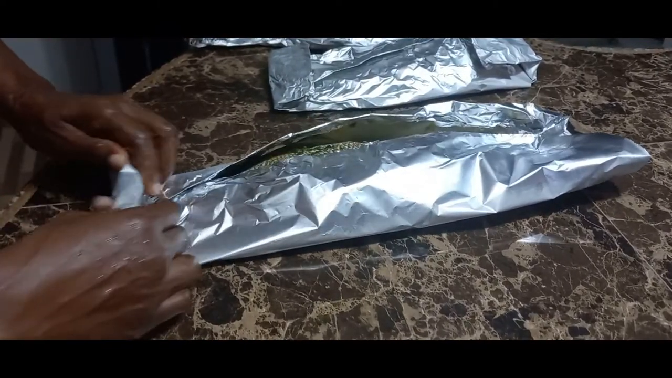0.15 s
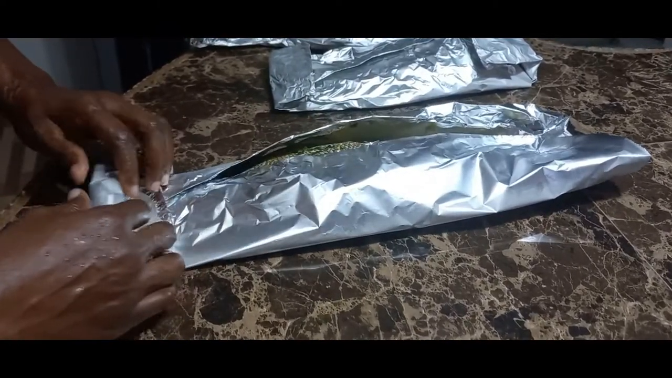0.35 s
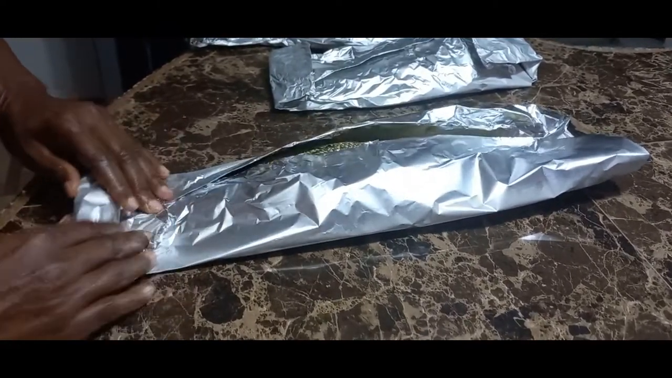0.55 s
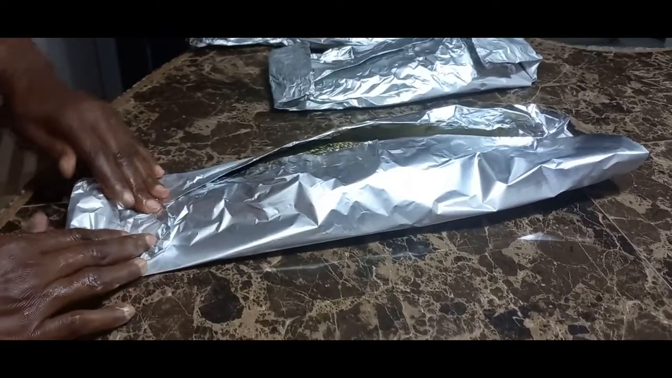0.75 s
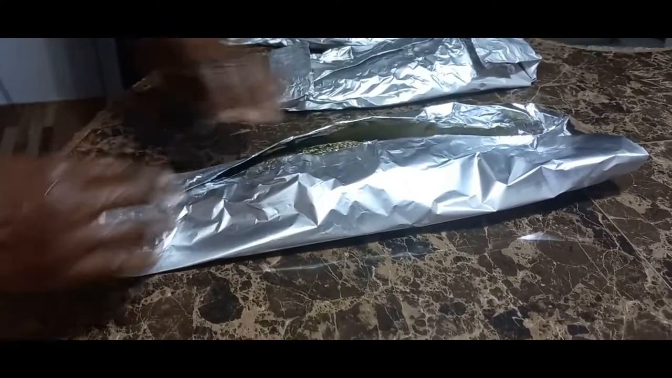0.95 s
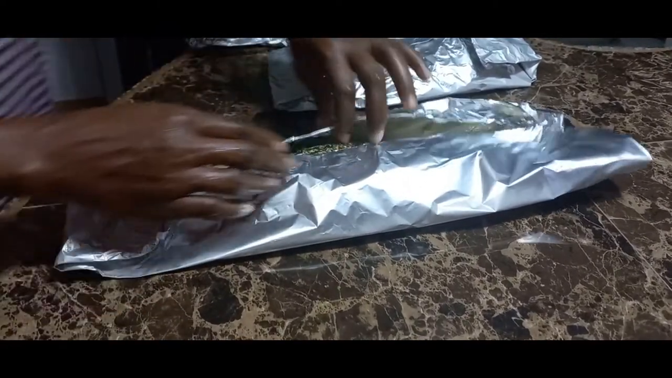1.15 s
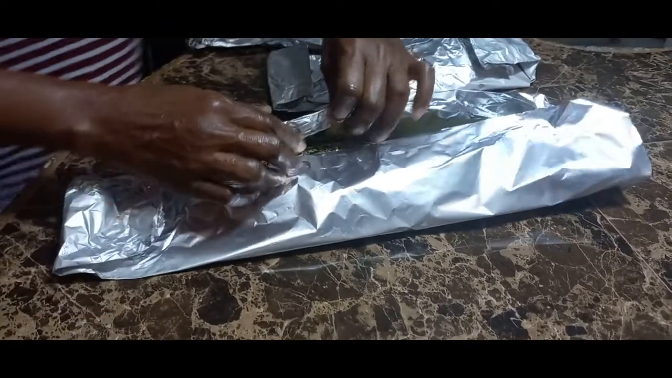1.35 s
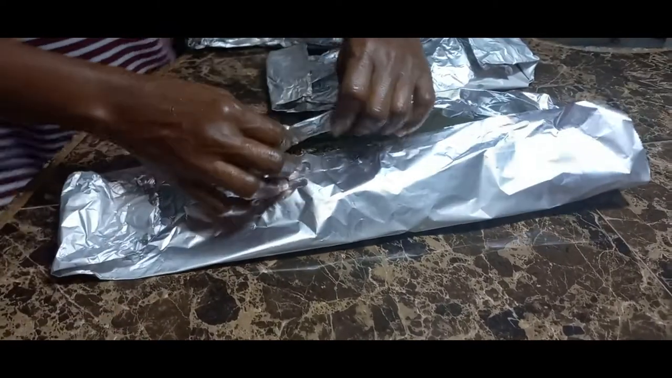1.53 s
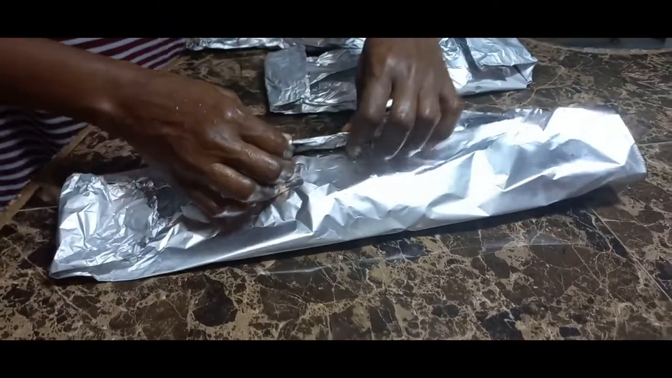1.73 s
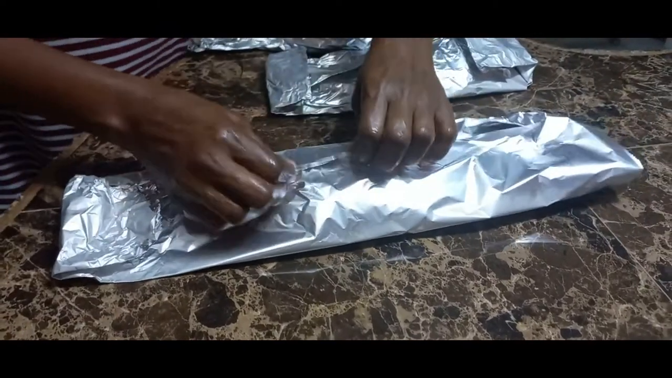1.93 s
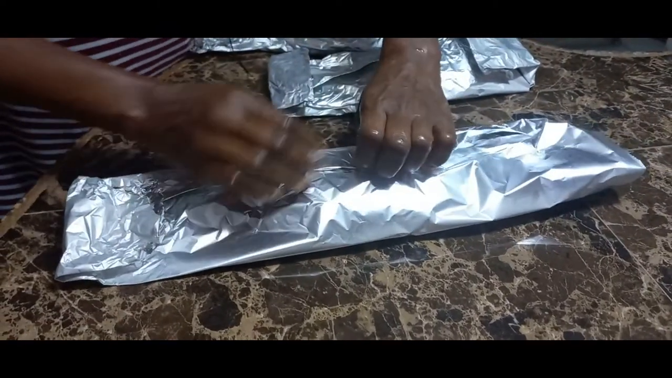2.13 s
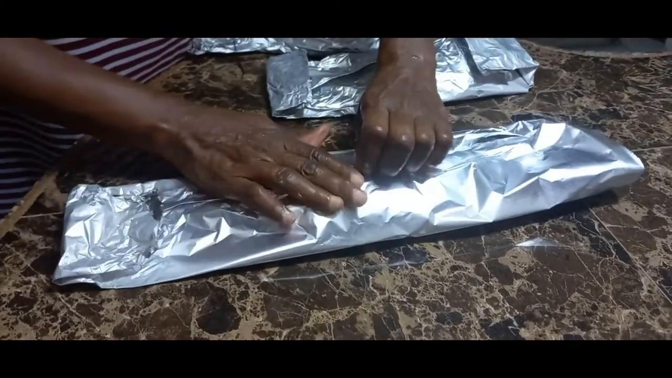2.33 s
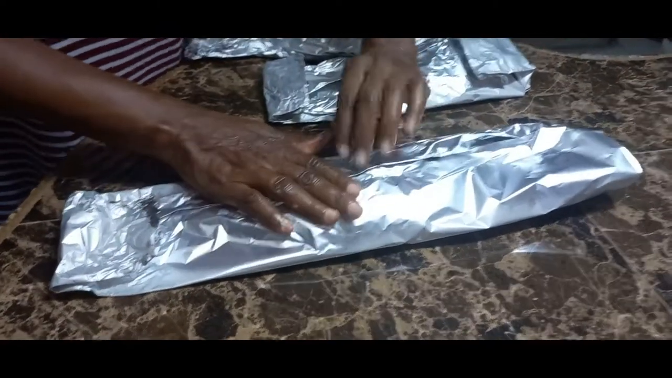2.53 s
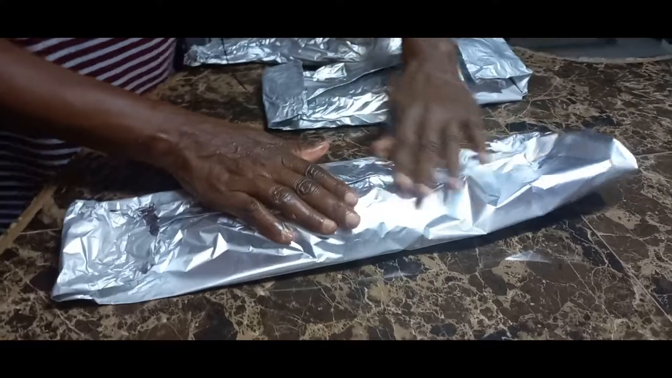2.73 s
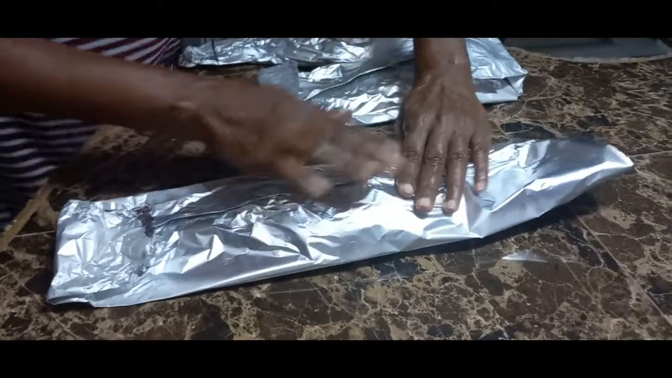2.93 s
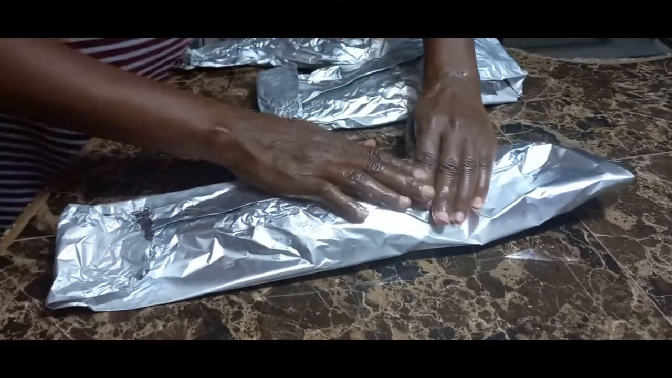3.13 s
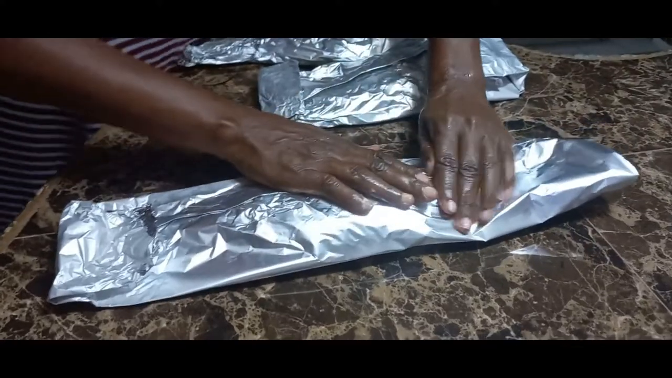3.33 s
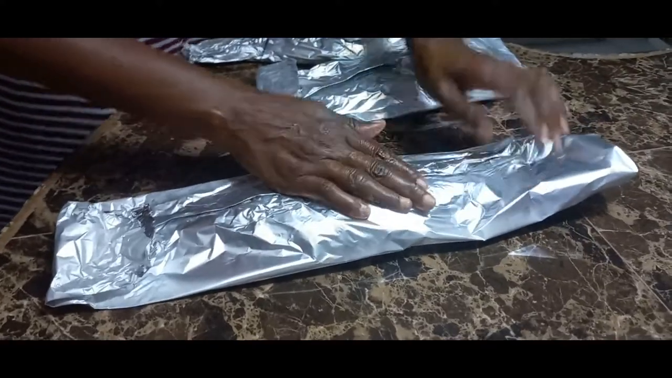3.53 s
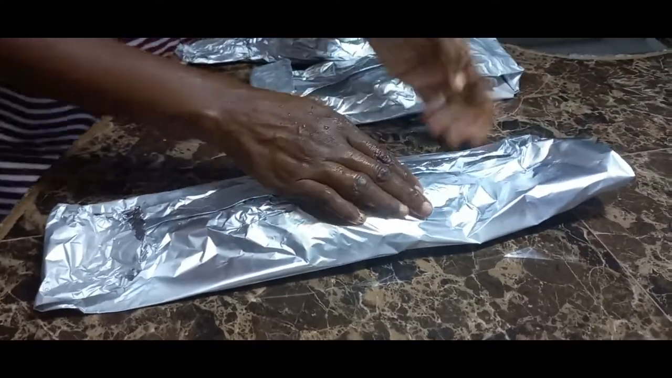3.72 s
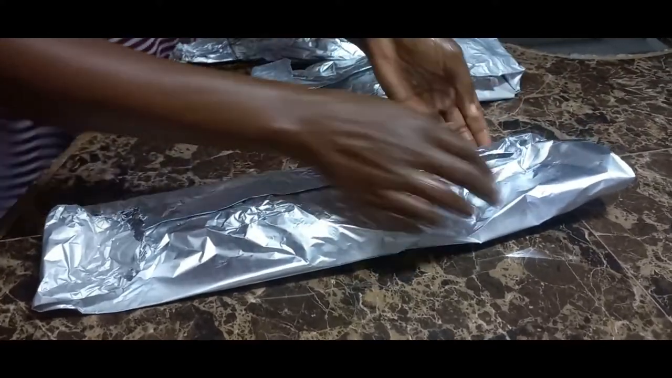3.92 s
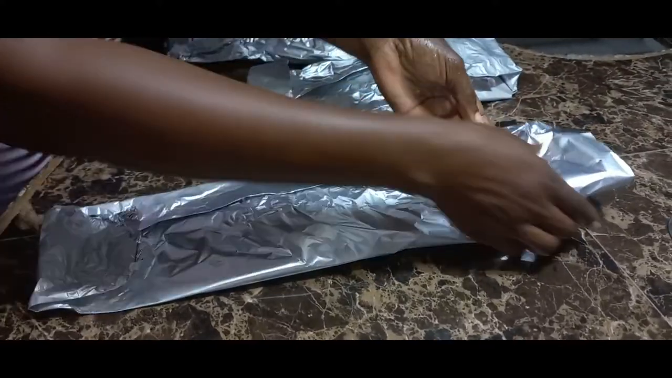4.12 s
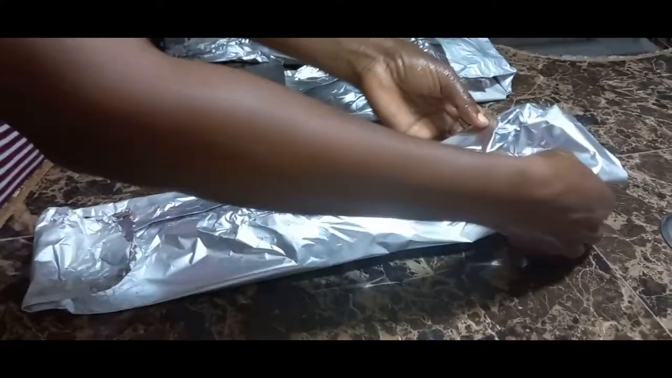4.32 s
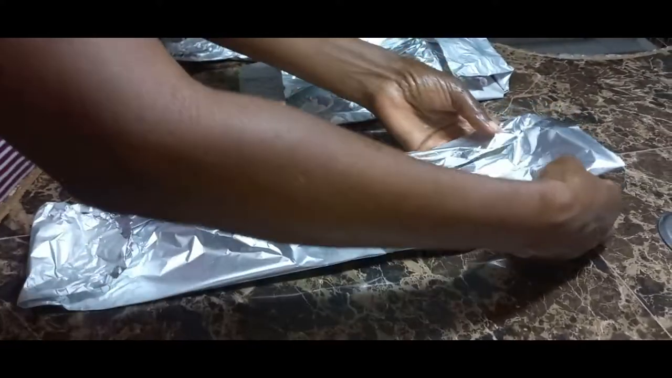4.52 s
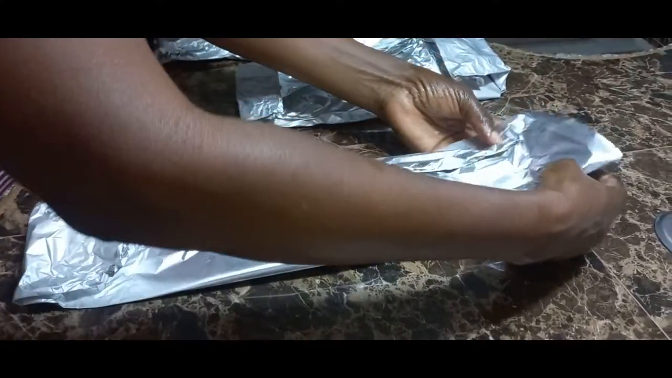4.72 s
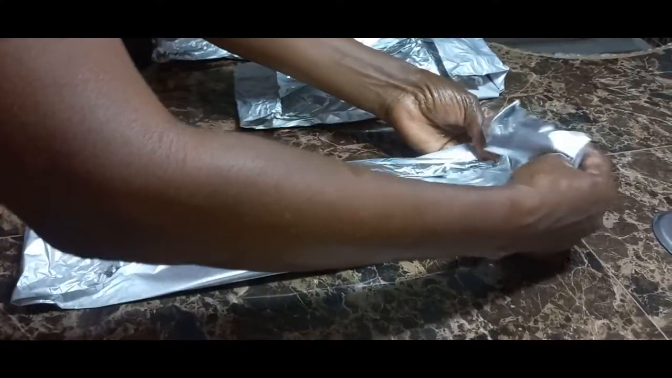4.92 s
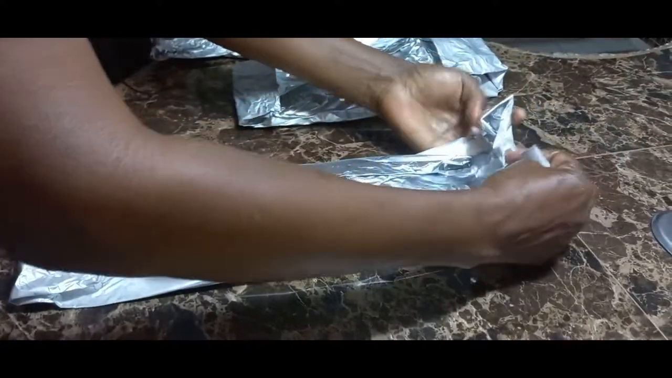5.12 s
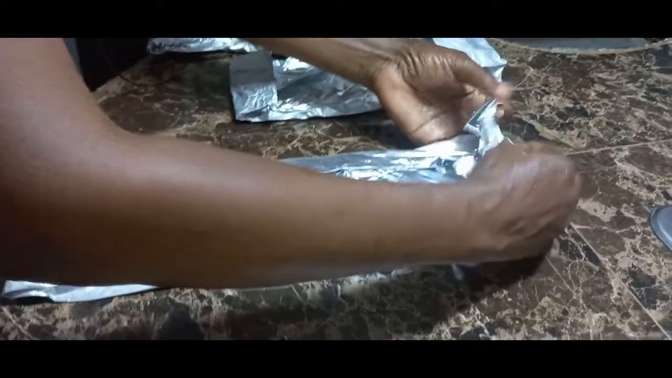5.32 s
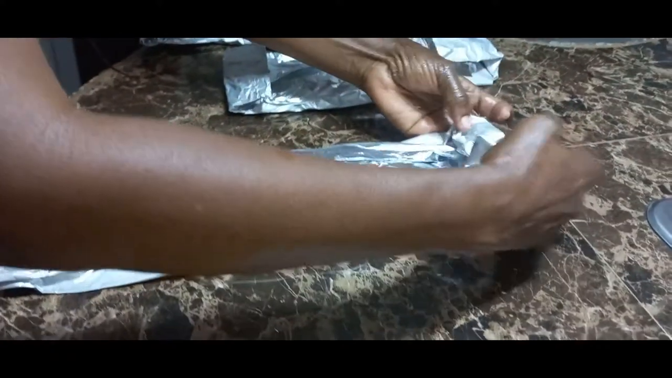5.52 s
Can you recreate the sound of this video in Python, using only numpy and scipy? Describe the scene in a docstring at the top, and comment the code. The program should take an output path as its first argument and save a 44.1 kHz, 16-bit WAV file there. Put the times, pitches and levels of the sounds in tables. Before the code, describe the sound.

Hands fold, crimp and press aluminium foil around a parcel in repeated bright, crackling bursts, with sharper snaps, in a small kitchen.

```python
"""Wrapping a parcel in foil.

Two hands fold, crimp and press aluminium foil round a parcel on a kitchen counter. Each push makes
creases buckle in a shower of tiny clicks, with louder snaps as large creases flip. These impulses
excite flat panels, which ring near 2 kHz, and the hollow parcel, which crunches.
A small hard room reverberates, over low noise and the faint hum of an appliance."""
import sys
import numpy as np
from scipy import signal
from scipy.fft import rfft, irfft, next_fast_len
from scipy.io import wavfile

SR = 44100
rng = np.random.default_rng(int(sys.argv[2]) if len(sys.argv) > 2 else 0)


def dump(signal):
    """Clip the signal to [-1, 1] and save it as 16-bit WAV at the path in sys.argv[1]."""
    limited = np.clip(np.atleast_2d(signal).T, -1, 1)
    pcm = np.round(limited * 32767).astype(np.int16)
    wavfile.write(sys.argv[1], SR, pcm)


N = 245195
TIME = np.arange(N) / SR
BAND_LIMIT_HZ = 15950

# Levels in all tables are relative: later gains set the loudness.
# Pushes of the fingers. Each row: start, tightening time and easing time in seconds, crackle level
# in dB, then panel ring, hollow crunch and brightness in dB against the crackle.
PUSHES = [(0.0, 0.00033, 0.04, -45.5, -4, -17, -2.5), (0.079, 0.087, 0.088, -55.5, -4, -31, -2.5),
          (0.295, 0.021, 0.029, -60, -13, -26.5, -1), (0.339, 0.017, 0.15, -53, -3.5, -24, -1.5),
          (0.501, 0.023, 0.1, -49.5, -7, -16, 0), (0.585, 0.096, 0.019, -46.5, -9, -21, -1.5),
          (0.811, 0.0085, 0.022, -74, 17.5, -7, -14), (0.874, 0.046, 0.029, -55.5, -4.5, -19, -2),
          (0.954, 0.0054, 0.0018, -45, -20, -26, 5.5), (1.181, 0.018, 0.13, -52, -7.5, -7, -1.5),
          (1.269, 0.096, 0.062, -47, -3.5, -7.5, -5.5), (1.389, 0.014, 0.11, -47, -5.5, -16.5, -1),
          (1.489, 0.017, 0.08, -44.5, -6.5, -10.5, -0.5), (1.564, 0.0092, 0.0074, -47.5, -1, -1, -11),
          (1.633, 0.045, 0.037, -49.5, -2.5, -11.5, -6), (1.757, 0.017, 0.12, -44.5, -9, -18, -1.5),
          (1.875, 0.0081, 0.093, -39, -10, -14, -2), (1.991, 0.071, 0.12, -46, -8, -19, 0),
          (2.25, 0.023, 0.022, -55, -3, -18, -1), (2.279, 0.051, 0.037, -46, -11, -12.5, -6),
          (2.325, 0.013, 0.03, -39.5, -2, -17, -5), (2.373, 0.035, 0.037, -46, -5, -14.5, -2),
          (2.464, 0.059, 0.032, -50, 1.5, -19, -3), (2.614, 0.069, 0.041, -52, -4, -17, -3.5),
          (2.745, 0.048, 0.027, -51, -5, -13, -6), (2.784, 0.017, 0.13, -44, -9, -12, -3.5),
          (2.998, 0.041, 0.064, -48, -5.5, -12.5, -6), (3.08, 0.036, 0.23, -47.5, -4.5, -12.5, -2),
          (3.225, 0.066, 0.043, -44, -4.5, -7.5, -3.5), (3.35, 0.012, 0.38, -53.5, -5, -13, -1.5),
          (3.495, 0.034, 0.055, -50, -7, -10.5, -1.5), (3.629, 0.062, 0.037, -59.5, -9, -27.5, -4),
          (3.75, 0.071, 0.04, -70, -3, -23, 1), (3.825, .02, 0.022, -59.5, -9.5, -30.5, 2),
          (3.886, 0.0052, 0.15, -57, -6, -14.5, -5), (4.007, 0.017, 0.069, -45.5, -7, -12.5, -2.5),
          (4.13, 0.008, 0.15, -53.5, -5.5, -21, -6), (4.207, 0.016, 0.071, -45, -4, -9.5, -1.5),
          (4.255, 0.036, 0.12, -43, -6.5, -12, -1.5), (4.399, 0.11, 0.036, -45.5, -5.5, -15, -4.5),
          (4.478, 0.028, 0.08, -38.5, -9, -14.5, -1.5), (4.6, .02, 0.35, -46.5, -7.5, -17, -3),
          (4.729, 0.082, 0.18, -40, -7, -13.5, -2), (4.999, 0.036, 0.02, -41, -12, -14.5, -0.5),
          (5.07, 0.053, 0.057, -50.5, -2, -9.5, -2), (5.141, 0.011, 0.016, -42.5, -19, -16.5, -3),
          (5.196, 0.052, 0.022, -47, -8.5, -10.5, -1.5), (5.29, 0.05, 0.13, -52.5, -5, -10, -6),
          (5.387, 0.017, 0.073, -46.5, -6.5, -9.5, 0), (5.445, 0.011, 0.082, -42, -9, -10, -5.5),
          (5.515, 0.072, 0.023, -43.5, -10, -10, -1)]
# Creases settling faintly throughout. One row: crackle, ring, crunch and brightness in dB, as above.
SETTLING = (-80.5, -5, -29, 13)
# Large creases giving way. Each row: start in seconds, crack level in dB, ring level in dB, pitch in Hz.
CREASE_SNAPS = [(0.296, -39.5, -56, 1880), (0.3466, -36, -50, 1930), (0.3582, -33, -58, 1900),
                (0.4538, -39, -55, 1900), (0.5076, -36.5, -61, 1840), (0.6605, -30, -56, 1950),
                (0.7004, -31, -48, 1804), (0.876, -39.5, -61.5, 1980), (1.191, -46, -60, 1760),
                (1.4222, -29.5, -65, 1880), (1.461, -36, -50, 1990), (1.5715, -33, -50, 1960),
                (1.656, -30.5, -65, 1960), (1.7018, -28, -57, 2310), (1.8795, -25.5, -46.5, 1920),
                (1.9176, -23.5, -48, 2000), (2.0076, -29, -48, 2000), (2.3348, -26.5, -40.5, 1994),
                (2.3426, -23, -60, 1890), (2.504, -28, -44, 1810), (2.5417, -30, -57, 2320),
                (2.651, -58, -52, 2030), (2.807, -29.5, -66, 2150), (2.9102, -38, -46, 2185),
                (3.0238, -29.5, -72, 2040), (3.0935, -31, -59, 2020), (3.1276, -25.5, -66, 1930),
                (3.8893, -37, -61, 2000), (3.9746, -46, -55, 1990), (4.0183, -42, -54, 1860),
                (4.1375, -34.5, -56, 2360), (4.1736, -51, -54, 1650), (4.2196, -34, -48.5, 1870),
                (4.289, -42, -51, 1830), (4.501, -36, -46, 2020), (4.8266, -25.5, -67, 1860),
                (5.04, -31, -53, 2110), (5.1466, -31.5, -58, 2180), (5.294, -26, -51, 2200),
                (5.4526, -32, -62, 1650), (5.464, -25.5, -55.5, 1970)]
# Free edges flicking. Each row: start in seconds, level in dB, band centre in Hz.
EDGE_FLICKS = [(0.136, -40.5, 11900), (0.616, -33.5, 4600), (0.9287, -44, 12000), (1.613, -29, 12300),
               (2.2675, -31, 13000), (2.6237, -37, 11500), (3.2185, -34, 12000), (3.224, -32, 12500),
               (3.3954, -40.5, 12500), (3.728, -39, 12800), (4.46, -31, 4070)]
# Spectrum of a buckling crease. Each row: frequency in Hz, gain in dB.
CREASE_SPECTRUM = [(300, -35), (1000, -18), (1900, -3), (2900, -3), (4000, 0.5), (5800, -1.04), (7500, -1),
                   (10000, -3.5), (12200, 3), (15500, -4.5)]
# Spectrum of the squeezed parcel. Each row: frequency in Hz, gain in dB.
PARCEL_SPECTRUM = [(60, -34.5), (250, -10), (420, -14.5), (600, -7.5), (850, -0.5), (1200, 3.5), (1500, -2),
                   (2200, -8.5), (5000, -71)]
# Reverberation of the kitchen. Each row: frequency in Hz, time to decay by 60 dB in seconds.
ROOM_T60 = [(300, 0.29), (1600, 0.28), (2100, 0.26), (2900, 0.37), (4000, 0.38), (9000, 0.29),
            (16000, 0.22)]
# Background noise of the room. Each row: frequency in Hz, spectral density in dB.
NOISE_SPECTRUM = [(25, -13), (55, 9), (110, 5), (250, 5), (400, -1.5), (700, -6), (1500, -21), (4000, -67),
                  (16000, -20.5)]
# Partials of the appliance hum. Each row: frequency in Hz, level in dB.
HUM_PARTIALS = [(104.6, -89.5), (199.2, -97), (258.4, -95), (298.6, -89)]
# Unequal colour of two microphones. Each row: frequency in Hz, gain of left over right in dB.
STEREO_BALANCE = [(200, 10), (500, -0.5), (1200, -3.5), (2500, -3), (5000, 2), (9000, -1), (14000, -3.5)]
# Stereo width, narrower in the bass. Each row: frequency in Hz, gain of the side signal in dB.
STEREO_WIDTH = [(100, -5.5), (500, -7.5), (1000, -3), (2000, 0), (16000, 0)]


def crinkle(crackle_db=-3, ring_db=-6, crunch_db=-4, facet_t60=0.012, hollow_t60=0.015, facets=100):
    """Impulse excitation: each buckle drives one of many facets, a panel and the hollow parcel."""
    effort_db, panel_db, press_db, bright_db = hands()
    clicks = buckles(effort_db) * from_db(effort_db)
    facet = rng.integers(0, facets, N)
    panel_drive = clicks * from_db(panel_db + ring_db)
    parcel_drive = clicks * from_db(press_db + crunch_db)
    ticks = [crack(facet_t60 * rng.uniform(.5, 2), uneven_db=5.8, tick=.3) for _ in range(facets)]
    tones = [panel(hz=2004, scatter=0.0866, t60=0.025) for _ in range(facets)]
    knocks = [crack(hollow_t60, uneven_db=7.5, tick=0.43) for _ in range(facets)]
    crackle, ring, crunch = np.zeros((3, 2, N))
    for i in np.flatnonzero(clicks):
        add(crackle, TIME[i], clicks[i] * ticks[facet[i]])
        add(ring, TIME[i], panel_drive[i] * tones[facet[i]])
        add(crunch, TIME[i], parcel_drive[i] * knocks[facet[i]])
    crackle = from_db(crackle_db) * grip(colour(crackle, CREASE_SPECTRUM), bright_db)
    return crackle + ring + colour(crunch, PARCEL_SPECTRUM)


def hands():
    """Incoherent addition: pushes sum in power, which weights their ring, crunch and brightness."""
    strength = np.array([push(*row[:3]) for row in PUSHES] + [np.ones(N)])
    level_db, *character_db = np.transpose([row[3:] for row in PUSHES] + [SETTLING])
    power = (from_db(level_db)[:, None] * strength) ** 2
    total = power.sum(0)
    return 10 * np.log10(total), *(np.array(character_db) @ power / total)


def push(start, tighten_s, ease_s, touch_db=-4.5, eased_db=-6, release_db_per_s=259):
    """Loading and unloading: the fingers land, tighten to a peak, ease, and leave in exponential decay."""
    t, end = TIME - start, tighten_s + ease_s
    landing = np.clip(t / (0.22 * tighten_s), 0, 1)
    shape_db = np.interp(t, [0, tighten_s, end], [touch_db, 0, eased_db])
    return landing * from_db(shape_db - release_db_per_s * np.clip(t - end, 0, 1))


def buckles(effort_db, base_per_s=1500, spread_db=4.0, growth=.65, share_s=0.054, clump_db=2, clump_s=.009):
    """Buckling as a random process: effort raises the rate, and big clicks use up the nearby strain."""
    rate = base_per_s * from_db(growth * (effort_db - np.max(effort_db) + 10.5))
    occurs = rng.random(N) < rate / SR
    clicks = occurs * from_db(spread_db * np.minimum(rng.exponential(1, N), 3.3))
    knots = np.arange(0, TIME[-1] + clump_s, clump_s)
    clicks *= from_db(clump_db * wander(TIME, knots))  # loud clicks come in clumps
    window = np.hanning(2 * int(share_s * SR / 2) + 1)
    local_power = signal.fftconvolve(clicks ** 2, window / window.sum(), "same")
    return clicks * rng.choice([-1, 1], N) / np.sqrt(abs(local_power) + 0.0019)


def crack(t60, uneven_db, tick, rise_s=0.0001, echo=0.82, echoes=5, size=1280):
    """Interference: a tick and an unevenly radiated flutter meet their echoes off foil and counter."""
    t, hz = np.arange(size) / SR, np.fft.rfftfreq(size, 1 / SR)
    burst = unit(rng.standard_normal((2, size)) * envelope(t, rise_s, t60))
    burst[[0, 1], [rng.integers(1, 6), 2]] += tick  # arrives at nearly the same time on both sides
    radiation = from_db(uneven_db * wander(hz, np.geomspace(1000, BAND_LIMIT_HZ, 14)))
    delays_s = rng.uniform(0.000518, .008, (2, echoes, 1))
    comb = 1 + echo * np.exp(-2j * np.pi * hz * delays_s).sum(1) / np.sqrt(echoes)
    return unit(irfft(rfft(burst) * radiation * comb))


def panel(hz, scatter, t60, rise_s=0.00059, modes=6, size=3072):
    """Modal vibration: a flat panel rings in a few close, damped modes that shift with every fold."""
    t = np.arange(size) / SR
    mode_hz = hz * np.exp(scatter * rng.standard_normal((modes, 1, 1)))
    phase = 2 * np.pi * rng.random((modes, 1, 1)) + rng.standard_normal((modes, 2, 1))
    return unit(np.sin(2 * np.pi * mode_hz * t + phase).sum(0) * envelope(t, rise_s, t60))


def grip(x, bright_db, pivot_hz=8000):
    """Spectral tilt: tight crimping is brighter than smoothing flat."""
    treble = equalise(x, lambda hz: hz ** 6 / (hz ** 6 + pivot_hz ** 6))
    return treble * from_db(bright_db / 2) + (x - treble) * from_db(-bright_db / 2)


def snaps(crack_db=9, ring_db=23, cutoff_hz=1100):
    """Snap-through: a large crease flips over with a crack and sets its panel ringing."""
    cracks, rings = np.zeros((2, 2, N))
    for start, level_db, panel_db, hz in CREASE_SNAPS:
        flip = crack(t60=.018, uneven_db=2.5, tick=.05, rise_s=.0008, echo=.35)
        add(cracks, start, from_db(level_db + crack_db) * flip)
        add(rings, start, from_db(panel_db + ring_db) * panel(hz, scatter=.06, t60=.022))
    # a small panel radiates little bass
    highpass = signal.butter(2, cutoff_hz, "high", fs=SR, output="sos")
    return colour(cracks, CREASE_SPECTRUM) + signal.sosfilt(highpass, rings)


def flicks(gain_db=8.5):
    """Band-limited transients: a free edge flicks with a thin, dry tick."""
    out = np.zeros((2, N))
    for start, level_db, hz in EDGE_FLICKS:
        flick = crack(t60=.009, uneven_db=2, tick=.1, echo=.25)
        band = signal.butter(1, [.85 * hz, 1.15 * hz], "band", fs=SR, output="sos")
        add(out, start, from_db(level_db + gain_db) * unit(signal.sosfilt(band, flick)))
    return out


def kitchen(x, tail_db=-4.5, rise_s=0.0016, turn_hz=1.3, tails=6):
    """Reverberation: reflections form a short bright tail whose pattern shifts as the hands move."""
    out = x.copy()
    for k in range(tails):
        hz, t, spectra = signal.stft(rng.standard_normal((2, SR // 3)), SR, nperseg=256)
        decay = from_db(-60 * t / at_hz(ROOM_T60, hz)[:, None])
        tail = signal.istft(spectra * decay, SR)[1]
        tail *= 1 - np.exp(-(np.arange(tail.shape[1]) / SR / rise_s) ** 2)
        # the tails take turns in pairs, so that their shares of the power sum to one
        share = np.sqrt(2 / tails) * np.cos(2 * np.pi * turn_hz * (1 + k // 2) * TIME + k * np.pi / 2)
        out += from_db(tail_db) * convolve(x * share, unit(tail))
    return out / np.hypot(1, from_db(tail_db))


def background(noise_db=-79, waver_hz=1.37):
    """Noise floor: low room noise lies under an appliance hum whose partials waver in frequency."""
    out = from_db(noise_db) * colour(rng.standard_normal((2, N)), NOISE_SPECTRUM, size=8192)
    for hz, level_db in HUM_PARTIALS:
        drift_hz = waver_hz * wander(TIME, np.linspace(0, TIME[-1], 30))
        phase = 2 * np.pi * np.cumsum(hz + drift_hz) / SR
        out += from_db(level_db) * np.sqrt(2) * np.sin(phase)
    return out


def from_db(db):
    """The decibel scale: 20 dB is a factor of ten in amplitude."""
    return 10 ** (np.asarray(db) / 20)


def unit(x):
    """Normalisation: the mean energy per channel becomes one."""
    return x / np.sqrt(np.mean(np.sum(x ** 2, -1)) + 1e-20)


def envelope(t, rise_s, t60):
    """Damping: after a quick rise, a vibration loses 60 dB every t60 seconds."""
    return from_db(-60 * t / t60) * (1 - np.exp(-t / rise_s))


def wander(axis, knots):
    """Correlated fluctuation: straight lines join Gaussian values at the knots."""
    return np.interp(axis, knots, rng.standard_normal(len(knots)))


def at_hz(points, hz):
    """Interpolation: a table is read on a log-frequency axis."""
    known_hz, value = np.transpose(points)
    return np.interp(np.log(hz + 1), np.log(known_hz + 1), value)


def add(mix, start_s, sound):
    """Superposition: a sound adds to the mix from its start time."""
    part = mix[:, max(round(start_s * SR), 0):][:, :sound.shape[1]]
    part += sound[:, :part.shape[1]]


def convolve(x, response):
    """Convolution: every sample sets off a scaled copy of the impulse response."""
    return signal.oaconvolve(np.atleast_2d(x), np.atleast_2d(response), axes=1)[:, :N]


def colour(x, points, size=2048):
    """Minimum-phase filtering: a causal response shapes the spectrum; white noise keeps its power."""
    log_gain = np.log(from_db(at_hz(points, abs(np.fft.fftfreq(size, 1 / SR)))))
    spectrum = np.exp(np.conj(signal.hilbert(log_gain)))
    return convolve(x, unit(np.fft.ifft(spectrum).real[:size // 2]))


def equalise(x, gain):
    """Zero-phase filtering: each frequency is scaled by gain(hz)."""
    size = next_fast_len(N + 4096)
    return irfft(rfft(x, size) * gain(np.fft.rfftfreq(size, 1 / SR)), size)[..., :N]


def scene():
    """Stereo pickup: two close microphones hear the foil in the kitchen, its low sounds more alike."""
    foil = kitchen(crinkle() + snaps() + flicks())
    foil = equalise(foil, lambda hz: from_db(np.outer([.5, -.5], at_hz(STEREO_BALANCE, hz))))
    left, right = foil + background()
    mid = (left + right) / 2
    side = equalise((left - right) / 2, lambda hz: from_db(at_hz(STEREO_WIDTH, hz)))
    return from_db(4.5) * np.array([mid + side, mid - side])


def record(dry):
    """Band limiting: a steep low-pass filter removes the highest treble."""
    lowpass = signal.firwin(601, BAND_LIMIT_HZ, window=("kaiser", 8), fs=SR)
    return signal.oaconvolve(dry, lowpass[None], "same", axes=1)


dry = scene()
out = record(dry)
dump(out)
```